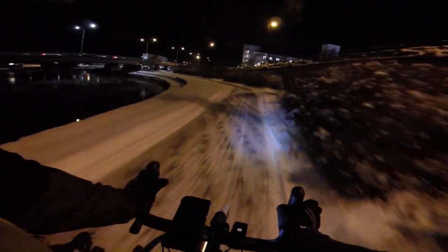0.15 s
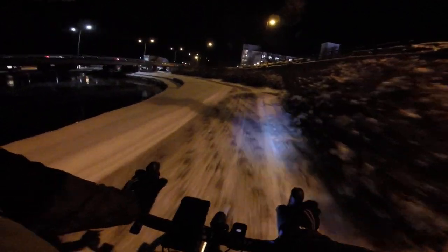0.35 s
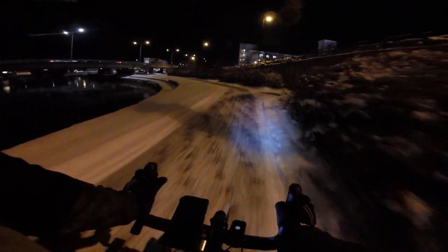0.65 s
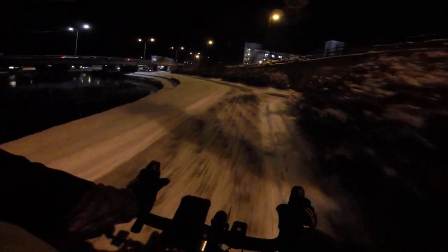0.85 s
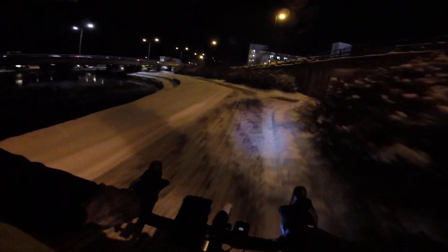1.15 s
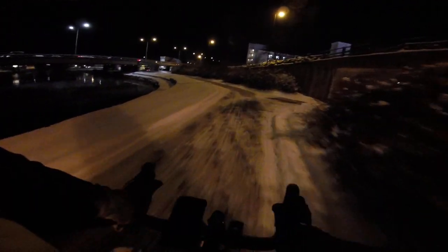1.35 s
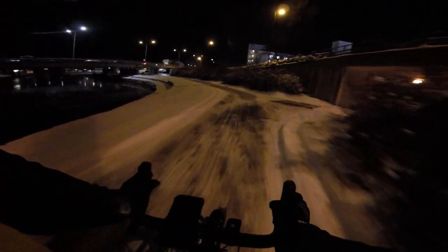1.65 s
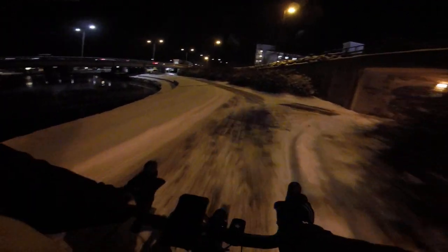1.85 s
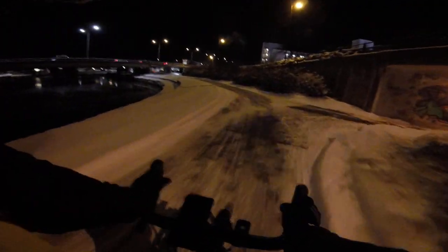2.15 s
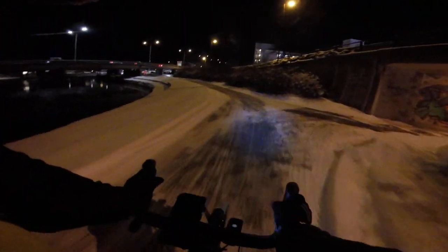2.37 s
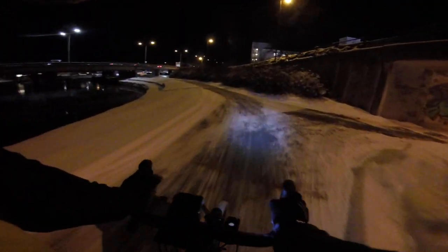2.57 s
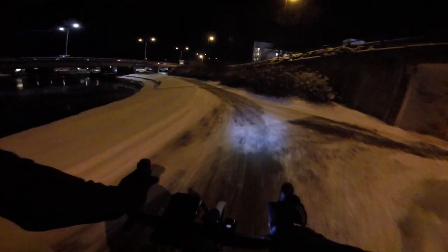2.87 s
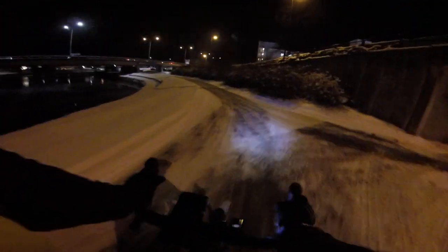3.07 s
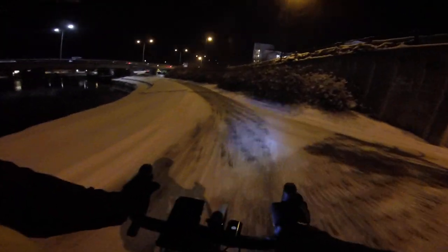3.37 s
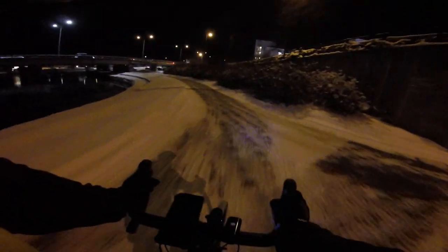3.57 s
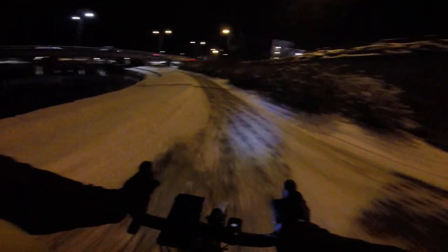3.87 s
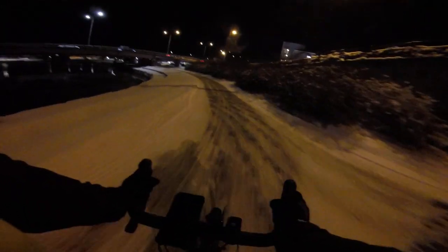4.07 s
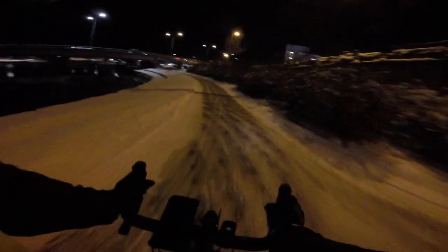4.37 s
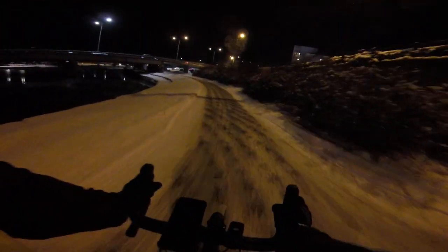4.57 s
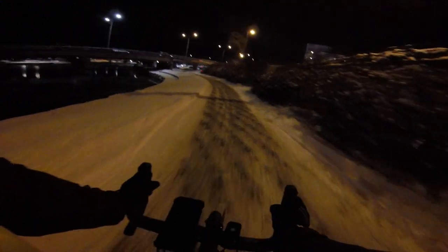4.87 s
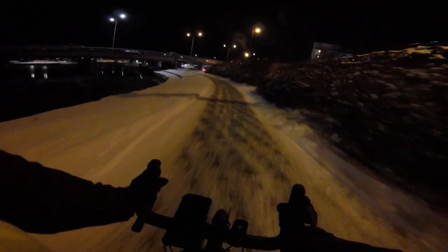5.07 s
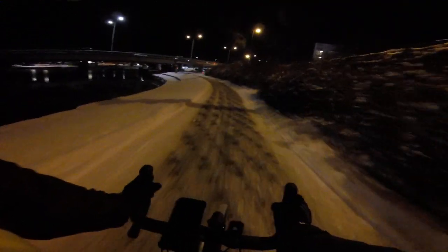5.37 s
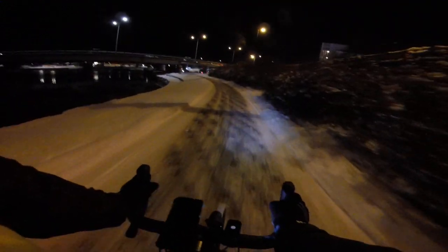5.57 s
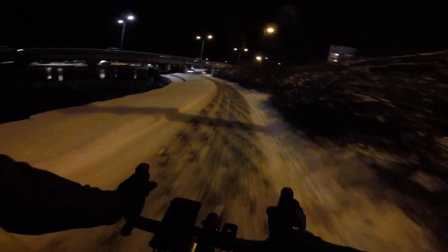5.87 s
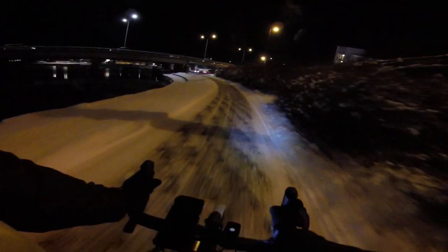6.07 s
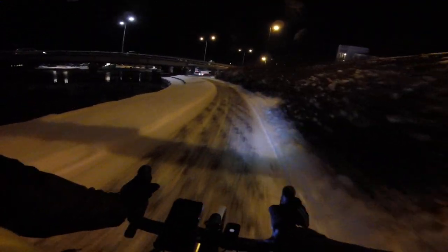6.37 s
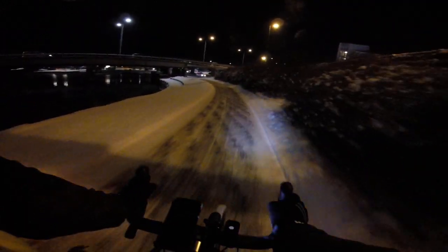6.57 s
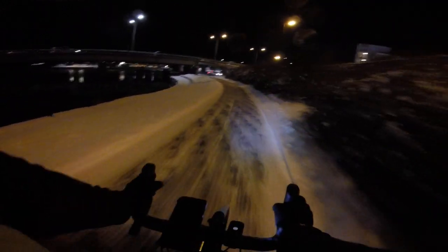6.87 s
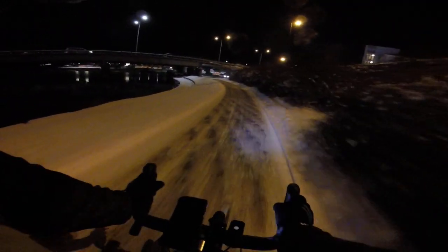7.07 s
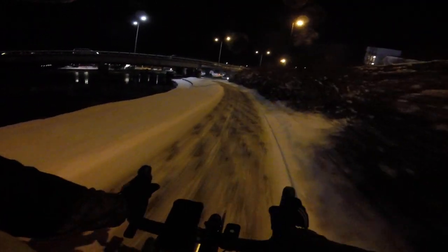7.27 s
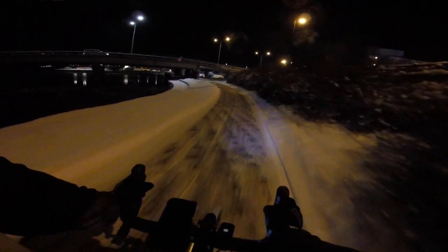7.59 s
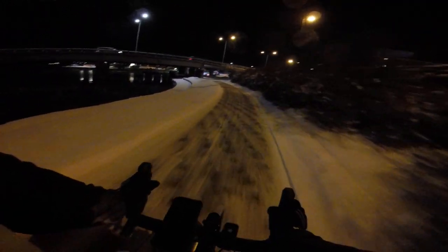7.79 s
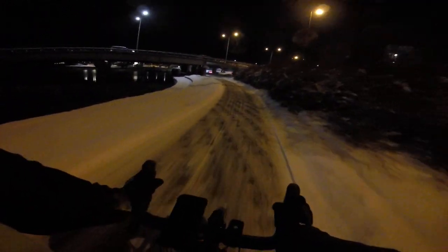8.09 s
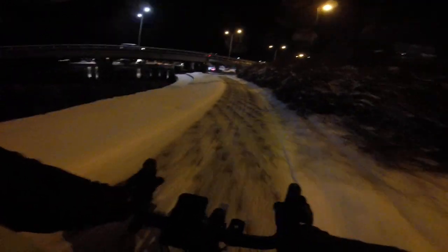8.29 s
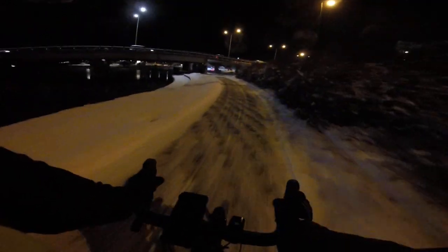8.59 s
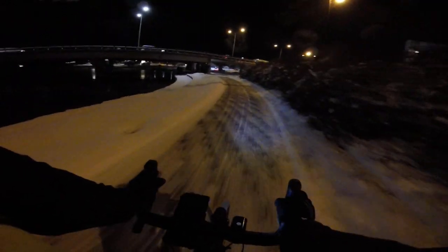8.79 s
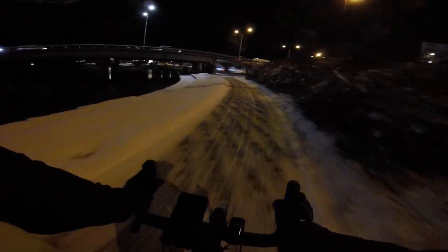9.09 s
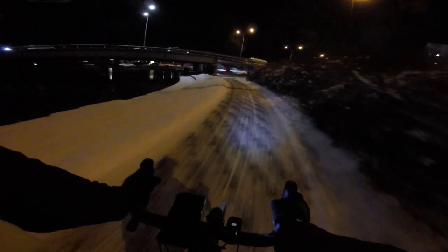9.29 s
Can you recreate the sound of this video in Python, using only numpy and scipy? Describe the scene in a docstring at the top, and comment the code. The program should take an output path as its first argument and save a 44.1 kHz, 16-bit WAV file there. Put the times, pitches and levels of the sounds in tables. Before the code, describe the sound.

Low, gusting wind hits a microphone worn by a cyclist riding outdoors. Beneath it the tyres hum and crackle continuously through thin snow and ice, with scattered sharp ticks, brief sprays of snow and dull bumps that lightly rattle the handlebar fittings. A few dull wind pops come about a third of the way through. Towards the end the crunch takes on a faint singing tone, followed by one light metal clink.

```python
"""Head wind rumbles on the microphone over the drone and crackle of bicycle tyres on thin, packed snow.
We ride along at a steady pace, the microphone on the rider, everything close and dry. The tread drums
on the path and crushes snow and icy crust; chips tick, loose snow swishes, and bumps thud and knock the
fittings. Gusts pop about three seconds in; near the end the crunch sings faintly and metal clinks once."""
import sys
import numpy as np
from scipy import signal
from scipy.fft import rfft, irfft
from scipy.io import wavfile

SR = 44100
rng = np.random.default_rng(int(sys.argv[2]) if len(sys.argv) > 2 else 0)


def digitize_waveform(pressure):
    """Quantize a signal to 16-bit integers and store it at the path in sys.argv[1].

    Rows of a 2-D input are taken as channels; values are limited to [-1, 1].
    """
    field = np.atleast_2d(pressure).T
    bounded = np.clip(field, -1, 1)
    quanta = np.round(bounded * 32767).astype(np.int16)
    wavfile.write(sys.argv[1], SR, quanta)


N = 416304
TIME = np.arange(N) / SR

# The snow underneath, soft to frozen hard. Each row: time in seconds, crunch in dB, icy crackle in dB.
SNOW_LEVELS = [(0, -62.5, -58), (.38, -61.5, -64), (.75, -61, -66.5), (1.1, -61.5, -65.5),
               (1.38, -60.5, -65.5), (1.7, -60.5, -62.5), (2.0, -61, -67.5), (2.3, -62, -76.5),
               (2.6, -58.5, -60.5), (2.88, -62.5, -61), (3.42, -60.5, -67), (3.76, -58.5, -71),
               (3.95, -66.5, -58), (4.15, -57.5, -60.5), (4.42, -59, -62.5), (5.15, -60, -62),
               (5.5, -57, -62), (6.1, -61.5, -57), (6.33, -60, -58.5), (6.65, -59, -59), (6.9, -59, -60),
               (7.4, -58.5, -59.5), (7.68, -58, -57), (7.87, -61, -59.5), (8.5, -56.5, -61.5),
               (9.05, -64.5, -67.5), (9.44, -55.5, -58.5)]
# The spectrum of a snapping chip of grit or ice. Each row: frequency in Hz, relative level in dB.
CHIP_COLOUR = [(500, -4), (1300, -11), (1900, 3.5), (3500, -1), (4700, 3.5), (5600, -4.5), (7000, -23.5),
               (9500, -23), (11000, -33.5), (15500, -42)]
# Modes of the handlebar and its fittings. Each row: frequency in Hz, relative level in dB, t60 in seconds.
FITTING_MODES = [(710, -7, 0.0069), (893, -4.5, 0.01), (987, 1, .012), (1134, 2, 0.014),
                 (1230, -2.5, 0.0048), (1740, -7.5, .006)]


def gain_of(db):
    """Decibels to amplitude."""
    return 10 ** (np.asarray(db) / 20)


def unit_rms(x):
    """Scales to an rms of 1."""
    return x / np.sqrt(np.mean(x ** 2) + 1e-20)


def curve(rows, column=1):
    """One column of a table, joined by straight lines in time."""
    columns = np.transpose(rows)
    return np.interp(TIME, columns[0], columns[column])


def swell(middle_s, half_s):
    """A bell-shaped rise and fall with a top of 1."""
    return np.exp(-.5 * ((TIME - middle_s) / half_s) ** 2)


def add(mix, start_s, sound):
    """Mixes a sound in at a time."""
    part = mix[max(round(start_s * SR), 0):][:len(sound)]
    part += sound[:len(part)]


def spectrum_db(colour, hz):
    """The points of a spectrum, joined on a log-frequency axis."""
    points_hz, db = np.transpose(colour)
    return np.interp(np.log(hz + 1), np.log(points_hz), db)


def tinted(x, colour):
    """Gives a long sound a smooth spectrum and an rms of 1."""
    return unit_rms(irfft(rfft(x) * gain_of(spectrum_db(colour, np.fft.rfftfreq(N, 1 / SR))), N))


def wander(hz):
    """A random drift of rms 1, mostly slower than the given rate."""
    f = np.fft.rfftfreq(N, 1 / SR)
    return unit_rms(irfft(rfft(rng.standard_normal(N)) / (1 + (f / hz) ** 2), N))


def grains(per_s, spread_db):
    """Random clicks of either sign; a positive spread makes a few louder, a negative one a few softer."""
    size = gain_of(spread_db * np.minimum(rng.exponential(1, N), 4))
    return unit_rms(size * rng.choice([-1, 1], N) * (rng.random(N) < per_s / SR))


def eddies(colour, eddy_s, steadiness=0.77):
    """Turbulent pressure whose strength stays nearly even from one eddy to the next."""
    pressure = tinted(rng.standard_normal(N), colour)
    window = signal.windows.hann(int(2 * eddy_s * SR))
    power = signal.fftconvolve(pressure ** 2, window / window.sum(), "same")
    return unit_rms(pressure / power ** (steadiness / 2))


def wind(flutter_db=-44, flutter_follows=0.38, gusty_db=1.5):
    """Slow surges and quicker buffets roll over the microphone; finer turbulence flutters more steadily."""
    # The head wind rises and falls. Each row: time in seconds, buffeting in dB, deep surges in dB.
    head_wind = [(0, -30, -20), (.55, -32, -26), (1.35, -34, -21), (1.9, -29, -24), (2.15, -36, -15),
                 (2.35, -32.5, -15.5), (2.6, -31, -19), (3.35, -31, -19.5), (4.1, -28.5, -23),
                 (4.5, -33, -26.5), (5.3, -30, -22), (5.7, -27, -24), (6.3, -29, -19.5),
                 (6.6, -32.5, -20.5), (7.4, -27, -19.5), (7.9, -30, -25.5), (8.4, -31.5, -22.5),
                 (9.05, -27, -24), (9.44, -24, -20)]
    # Single gusts. Each row: middle and half length in seconds, change of buffeting and of surges in dB.
    gusts = [(0.21, 0.031, 4, 7.5), (0.798, 0.049, 1.5, 11), (1.082, 0.076, 12, 3), (1.491, 0.035, 9, 0),
             (1.68, 0.047, 2.5, -1), (2.599, 0.015, 13.5, -5), (2.995, 0.078, 7.5, 11),
             (3.293, 0.029, 0.5, 13.5), (3.74, .09, 3.5, 8.5), (4.074, 0.08, 7, 8.5), (4.319, 0.04, 9, 9.5),
             (4.599, 0.038, 2, 15), (4.968, 0.07, 5, 5), (6.004, 0.082, 2, 4.5), (6.134, 0.021, 4.5, -8),
             (6.965, 0.044, 6.5, -0.5), (7.116, 0.022, 7.5, -11), (7.717, .05, 6.5, 3.5),
             (8.023, 0.074, 5.5, 12.5), (8.249, 0.062, 6, 14.5), (8.494, 0.025, 6, 13),
             (8.736, 0.054, 2, 4.5), (8.949, 0.013, 5.5, 5), (9.204, 0.035, 7, -3.5)]
    # Spectra of the three sizes of turbulence. Each row: frequency in Hz, relative level in dB.
    surge_colour = [(2, -24), (6, -0.5), (12, 2.5), (25, -2), (32, -8), (50, -43), (150, -96.5)]
    buffet_colour = [(20, -10.5), (30, 5), (36, -4), (44, 3.5), (55, -11), (68, -15.5), (100, -47.5),
                     (400, -89.5)]
    flutter_colour = [(20, -33.5), (55, 4.5), (75, -0.5), (100, -6), (160, -24.5), (400, -44),
                      (2000, -81.5)]
    buffet_db = curve(head_wind) + sum(db * swell(s, half) for s, half, db, _ in gusts)
    buffet_db += gusty_db * wander(hz=16)
    surge_db = curve(head_wind, column=2) + sum(db * swell(s, half) for s, half, _, db in gusts)
    surges = gain_of(surge_db) * eddies(surge_colour, eddy_s=0.21)
    buffets = gain_of(buffet_db) * eddies(buffet_colour, eddy_s=0.068)
    flutter = tinted(rng.standard_normal(N), flutter_colour) * gain_of(flutter_follows * buffet_db)
    return surges + buffets + gain_of(flutter_db) * unit_rms(flutter)


def overloaded(pressure, ceiling=0.7):
    """The microphone gives way softly under the strongest surges."""
    return pressure / (1 + (pressure / ceiling) ** 4) ** (1 / 4)


def tyre_drone(tread_db=3, roar_db=1, lumpy_db=1.5, uneven_db=1.4, rattle_db=-14):
    """The tread drums and roars over ruts, which also keep the fittings chattering."""
    # Roughness of the path. Each row: time in seconds, relative levels of tread drone and of roar in dB.
    roughness = [(0, -58.5, -59.5), (.55, -57.5, -62), (1.05, -58.5, -61.5), (1.65, -58, -61),
                 (2.35, -55.5, -61), (2.7, -57, -61), (2.9, -54.5, -58.5), (3.5, -57, -60.5),
                 (4.2, -54.5, -59), (4.42, -57, -60.5), (4.9, -54.5, -61), (6.3, -55, -61.5),
                 (7.35, -57, -62), (8.22, -56.5, -59.5), (8.7, -56.5, -61), (9.44, -61.5, -61)]
    # Spectra of the tread's drone and the tyre's roar. Each row: frequency in Hz, relative level in dB.
    tread_colour = [(50, -17), (110, 3.5), (150, 1), (210, -1.5), (310, -8.5), (470, -20.5), (800, -39),
                    (2000, -66.5)]
    roar_colour = [(150, -3.5), (350, 0.5), (500, -0.5), (680, -3), (860, -3), (1150, -9), (1450, -11.5),
                   (2500, -18.5), (8000, -56.5)]
    ruts = gain_of(lumpy_db * wander(hz=27.4) + uneven_db * wander(hz=5.3))
    tread = gain_of(curve(roughness) + tread_db) * tinted(grains(per_s=1200, spread_db=3.5), tread_colour)
    roar = gain_of(roar_db) * tinted(grains(per_s=5000, spread_db=1.5), roar_colour)
    clacks = sum(ringing(grains(per_s=21, spread_db=-6.5), fitting_clack()) for _ in FITTING_MODES)
    chatter = gain_of(rattle_db) * unit_rms(clacks)
    return ruts * (tread + gain_of(curve(roughness, column=2)) * (roar + chatter))


def fitting_clack(pitch=1, detune=0.041, uneven_db=0.5, buzz=0.046, buzz_s=0.005, rise_s=0.00094):
    """One dry, padded clack of the loose fittings; each blow buzzes briefly and favours other modes."""
    t, ring = TIME[:SR // 10], 0
    for hz, db, t60 in FITTING_MODES:
        shift, strength = rng.standard_normal(2)
        mode_hz = hz * pitch * (1 + detune * shift)
        ring += gain_of(db + uneven_db * strength - 60 * t / t60) * np.sin(2 * np.pi * mode_hz * t)
    contact = (t == 0) + buzz * rng.standard_normal(len(t)) * np.exp(-t / buzz_s)
    clack = signal.fftconvolve(contact, ring * (1 - np.exp(-t / rise_s)))[:len(t)]
    return clack / abs(clack).max()


def ringing(clicks, ring):
    """Every click sets off the same ring."""
    return signal.oaconvolve(clicks, ring)[:N]


def snap(colour, tilt_db_per_octave=0, size=2048):
    """The short ring of one fracture: its spectrum, tilted and shaped by the body resonances."""
    # Body resonances that colour every snap. Each row: frequency in Hz, width in Hz, lift or dip in dB.
    body = [(1893, 31, 4), (2140, 43, 1), (2510, 120, 5.5), (2817, 130, 5.5), (3105, 120, 4.5),
            (3497, 410, 5.5), (4240, 230, 1.5), (4645, 97, 0.5), (5550, 250, -4.5), (6350, 170, -0.5)]
    f = np.fft.rfftfreq(size, 1 / SR)
    tilted = [(hz, db + tilt_db_per_octave * np.log2(hz)) for hz, db in colour]
    body_db = sum(db / (1 + (2 * (f - hz) / width) ** 2) for hz, width, db in body)
    shape_db = spectrum_db(tilted, f) + body_db
    log_gain = np.log(gain_of(np.r_[shape_db, shape_db[-2:0:-1]]))
    ring = np.fft.ifft(np.exp(np.conj(signal.hilbert(log_gain)))).real  # minimum phase: a sharp attack
    return ring / np.linalg.norm(ring)


def snow_crunch(level_db=-0.07, clump_db=2.06, patchy_db=1.13, coarse_db=-13):
    """Thousands of snow grains break each second, in clumps, louder with each turn of the pedals."""
    # The spectrum of packed snow breaking. Each row: frequency in Hz, relative level in dB.
    colour = [(400, -25.5), (1000, -9.5), (1430, -7.5), (1680, 2.5), (3200, -4), (3800, -5), (5100, -5),
              (5500, -5), (6000, -9.5), (6600, -15.5), (8000, -18), (9200, -17), (10400, -31), (15500, -34)]
    pedal_hz, push_at_s, push_db = 1, 0.96, 1.54
    pedal_db = push_db * np.cos(2 * np.pi * pedal_hz * (TIME - push_at_s))
    uneven_db = patchy_db * wander(hz=7.9) + clump_db * wander(hz=45)
    load = gain_of(curve(SNOW_LEVELS) + level_db + pedal_db + uneven_db)
    fine = grains(per_s=7000, spread_db=2.5)
    coarse = gain_of(coarse_db) * grains(per_s=160, spread_db=5)
    return ringing(load * (fine + coarse), snap(colour))


def icy_crust(level_db=-2, clump_db=1.94, patchy_db=1.0, detune=0.018):
    """The crust breaks in sparser, brighter cracks; its ring shifts from patch to patch."""
    # The spectrum of cracking crust. Each row: frequency in Hz, relative level in dB.
    colour = [(1000, -40.5), (3000, -24), (3780, -15.5), (4000, 5), (4180, 8.5), (4330, -1.5), (4480, 4.5),
              (4650, 9), (4850, 0.5), (5150, 0.5), (5480, -22.5), (5900, -7), (6550, -36.5), (7000, -13.5),
              (9000, -36.5), (12000, -44)]
    # Whole plates give way. Each row: middle in seconds, level in dB, half length in seconds.
    plates = [(2.858, -58.5, 0.03), (2.975, -68, 0.012), (4.12, -65, 0.035), (4.325, -57, 0.0059),
              (4.78, -61.5, 0.022), (5.436, -56, 0.0032), (5.64, -63.5, .015), (6.02, -68, 0.0074),
              (6.105, -63, 0.008), (6.195, -67, 0.012), (7.84, -61, .016)]
    uneven_db = patchy_db * wander(hz=1.9) + clump_db * wander(hz=47.3)
    load = gain_of(curve(SNOW_LEVELS, column=2) + level_db + uneven_db)
    load += sum(gain_of(db) * swell(s, half) for s, db, half in plates)
    clicks = load * grains(per_s=1500, spread_db=3)
    patch = np.clip(np.round(wander(hz=26)), -1, 1)
    out = np.zeros(N)
    for step in (-1, 0, 1):
        ring = snap([(hz * (1 + step * detune), db) for hz, db in colour])
        out += ringing(clicks * (patch == step), ring)
    return out


def ice_crystals(level_db=-12):
    """Stray ice crystals tick finely wherever the crust is breaking."""
    clicks = gain_of(curve(SNOW_LEVELS, column=2) + level_db) * grains(per_s=40, spread_db=3)
    return ringing(clicks, snap(CHIP_COLOUR, tilt_db_per_octave=5.5))


def microphone_hiss(level_db=-83):
    """The microphone's own even hiss."""
    return gain_of(level_db) * rng.standard_normal(N)


def chip_ticks(crumble=0.06, crumble_s=0.0054):
    """A chip breaks in one dry snap, and faint crumbs follow within milliseconds."""
    # Grit and ice under the tyre. Each row: start in seconds, peak in dB, brightness in dB per octave.
    chips = [(0.0757, -35, 4), (.1333, -39, 9), (.494, -44, 5), (1.012, -42, 6), (1.06, -41, 7),
             (1.527, -39, 7), (1.646, -38, 0), (1.7272, -38, 4), (1.753, -43, 5), (1.802, -44, 1),
             (2.625, -45, 2), (2.727, -39, 2), (3.2445, -42.5, 8), (4.6042, -36, -2), (4.7614, -37, -2),
             (5.281, -38, 2), (5.3311, -30, -1), (5.5712, -37, -1), (6.0145, -43, 9), (6.133, -40.5, 7),
             (6.192, -34, 3), (6.2615, -41, 7), (7.79, -34, 4), (8.702, -31, -5), (8.8397, -34.5, -4),
             (9.0972, -36.5, -2)]
    out, t = np.zeros(N), TIME[:SR // 40]
    for s, db, brightness in chips:
        fracture = (t == 0) + crumble * rng.standard_normal(len(t)) * np.exp(-t / crumble_s)
        tick = signal.fftconvolve(fracture, snap(CHIP_COLOUR, brightness))
        add(out, s, gain_of(db) * tick / abs(tick).max())
    return out


def snow_swishes(level_db=2):
    """The tyre ploughs loose snow into short, fine sprays that swell and fade."""
    # The sprays. Each row: middle in seconds, relative level in dB, half length in seconds.
    sprays = [(0.54, -60, .035), (0.852, -54, 0.022), (1.466, -57.5, 0.0081), (1.77, -63, .022),
              (2.338, -57.5, 0.0057), (2.472, -53.5, 0.01), (2.874, -54.5, 0.032), (2.978, -52.5, 0.0097),
              (3.079, -54, 0.016), (3.213, -66, 0.076), (3.733, -52.5, 0.015), (3.895, -54, 0.023),
              (4.282, -58.5, 0.013), (4.533, -52.5, 0.007), (5.2, -56, 0.021), (5.287, -59.5, 0.017),
              (5.755, -59, 0.029), (6.014, -55.5, 0.011), (6.248, -57, 0.02), (6.534, -61, 0.11),
              (6.757, -51.5, 0.022), (7.842, -58.5, 0.033), (8.368, -52.5, 0.011), (8.53, -58.5, 0.054),
              (8.893, -58, 0.029)]
    # The spectrum of spraying snow. Each row: frequency in Hz, relative level in dB.
    colour = [(500, -12), (1200, -6.5), (1900, 3), (2900, -0.5), (4700, -2), (5800, -6), (7000, -14),
              (9700, -21), (11000, -22), (15500, -41.5)]
    envelope = sum(gain_of(db + level_db) * swell(s, half) for s, db, half in sprays)
    return ringing(envelope * grains(per_s=7300, spread_db=2.5), snap(colour))


def bumps(uneven=0.23, scuff_db=-22, scuff_s=0.012):
    """The soft tyre turns each bump into a few uneven low cycles and a scuff; the fittings knock."""
    # Dull bumps. Each row: middle in seconds, peak in dB, pitch in Hz, rise and decay time in seconds.
    thuds = [(.76, -40.5, 190.3, 0.0088), (1.932, -39, 225.4, 0.0055), (2.183, -38.5, 183.5, 0.013),
             (2.398, -32, 147.6, 0.0063), (2.808, -30, 176, 0.0028), (2.964, -52, 237, 0.0015),
             (3.93, -38, 172, 0.0064), (4.192, -32.5, 174.7, 0.0058), (4.921, -32.5, 225.4, 0.0033),
             (5.463, -31.5, 187, 0.0038), (6.2, -42, 174, 0.005), (7.165, -35, 169, 0.0046),
             (8.105, -33.5, 188.6, 0.0033), (8.24, -38, 232.2, 0.016)]
    # Knocks of the fittings. Each row: start in seconds, peak in dB, pitch as a ratio.
    knocks = [(.722, -46, 0.9), (1.443, -47, 0.8), (2.164, -41, 0.85), (2.184, -45, 1), (2.367, -50, 0.8),
              (2.535, -45, 0.97), (2.566, -51, 1.05), (2.607, -45, 0.96), (2.78, -47, 1.1),
              (3.477, -45, 1.06), (3.565, -46.5, .98), (4.195, -43, 0.95), (4.266, -45, 0.8),
              (4.286, -44, 1.06), (4.905, -45, 0.77), (5.569, -48, 1), (6.288, -47, 0.97),
              (8.185, -46, 0.84), (8.229, -44, 0.91), (8.238, -42, 0.91), (8.242, -41, 0.88)]
    # The spectrum of the tyre scuffing. Each row: frequency in Hz, relative level in dB.
    scuff_colour = [(60, -1), (130, 4.5), (350, -8.5), (600, -13.5), (1200, -14), (2500, -39.5),
                    (8000, -57)]
    out, t = np.zeros(N), np.arange(-SR // 10, SR // 10) / SR
    wobble = 1 + uneven * wander(hz=192)
    for s, db, hz, decay_s in thuds:
        cycles = np.cumsum(hz * wobble[round(s * SR):][:len(t)]) / SR
        add(out, s + t[0], gain_of(db) * np.exp(-abs(t) / decay_s) * np.cos(2 * np.pi * cycles))
    for s, db, pitch in knocks:
        add(out, s, gain_of(db) * fitting_clack(pitch))
    scuffs = sum(gain_of(db + scuff_db) * swell(s, scuff_s) for s, db, _, _ in thuds)
    return out + scuffs * tinted(grains(per_s=3800, spread_db=2), scuff_colour)


def wind_pops(rise_s=0.00053):
    """Hard gusts pop right at the microphone: a sudden, dull jump of pressure that leaks away."""
    # The pops. Each row: start in seconds, strength in dB, decay in seconds.
    pops = [(2.966, -22, 0.0036), (3.263, -28, 0.002), (3.285, -17, 0.0062)]
    out = np.zeros(N)
    for s, db, decay_s in pops:
        t = np.maximum(TIME - s, 0)
        out += gain_of(db) * (1 - np.exp(-t / rise_s)) * np.exp(-t / decay_s)
    return out


def singing_snow(middle_s=8.7, half_s=0.63, level_db=-62.5, flicker_db=1.2):
    """Over one stretch of snow, fine grains excite two narrow resonances: a faint, rough singing."""
    # Hollow resonances in the crunch. Each row: frequency in Hz, width in Hz, relative level in dB.
    modes = [(2510, 95, -0.5), (3450, 240, 1)]
    f = np.fft.rfftfreq(N, 1 / SR)
    response = sum(gain_of(db) / (1 + 1j * (f - hz) / width) ** 2 for hz, width, db in modes)
    drive = grains(per_s=3000, spread_db=2) * gain_of(flicker_db * wander(hz=20))
    singing = unit_rms(irfft(rfft(drive) * response, N))
    return gain_of(level_db) * swell(middle_s, half_s) * singing


def metal_clink():
    """A light tap rings a small metal part on the bicycle."""
    # The tap. Each row: start in seconds, peak in dB.
    taps = [(9.2336, -32.5)]
    # The part's modes. Each row: frequency in Hz, relative level in dB, t60 in seconds.
    modes = [(2410, -6, .012), (3650, 3, 0.019), (4600, 1, 0.018), (4570, -14, .015)]
    out, t = np.zeros(N), TIME[:SR // 20]
    ring = sum(gain_of(db - 60 * t / t60) * np.sin(2 * np.pi * hz * t) for hz, db, t60 in modes)
    for s, db in taps:
        add(out, s, gain_of(db) * ring / abs(ring).max())
    return out


def scene():
    """One microphone on the rider, in open air: wind right on it, tyres and snow just below."""
    snow = snow_crunch() + icy_crust() + snow_swishes() + chip_ticks() + ice_crystals() + singing_snow()
    air = overloaded(wind()) + wind_pops()
    bicycle = tyre_drone() + bumps() + metal_clink()
    return (air + bicycle + snow + microphone_hiss())[None]


def record(dry, fade_s=0.02, edge_hz=15700):
    """A brief fade at both ends, then the band limit of the rider's camera."""
    to_nearest_end_s = np.minimum(TIME, TIME[::-1])
    fade = np.sin(np.pi / 2 * np.minimum(to_nearest_end_s / fade_s, 1)) ** 2
    low_pass = signal.firwin(511, edge_hz, window=("kaiser", 9), fs=SR)
    return signal.oaconvolve(dry * fade, low_pass[None], "same")


dry = scene()
out = record(dry)
digitize_waveform(out)
```